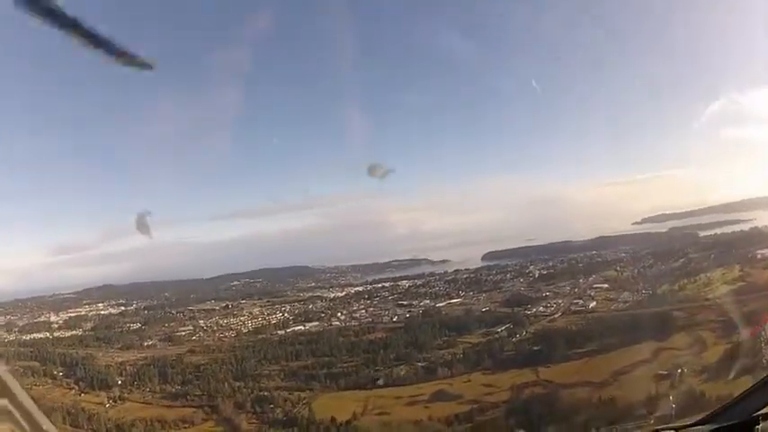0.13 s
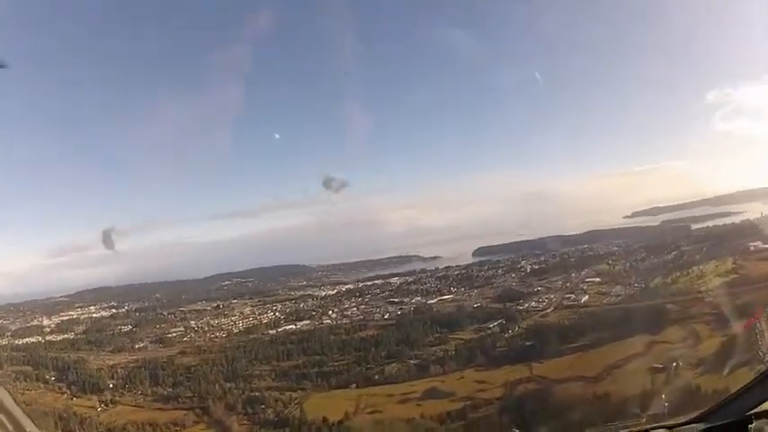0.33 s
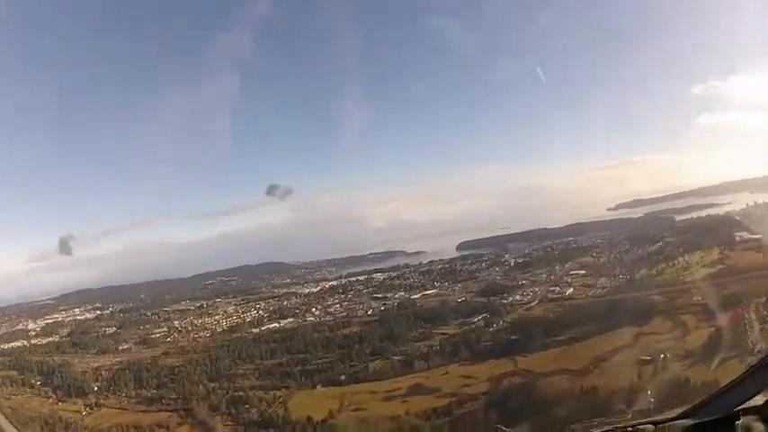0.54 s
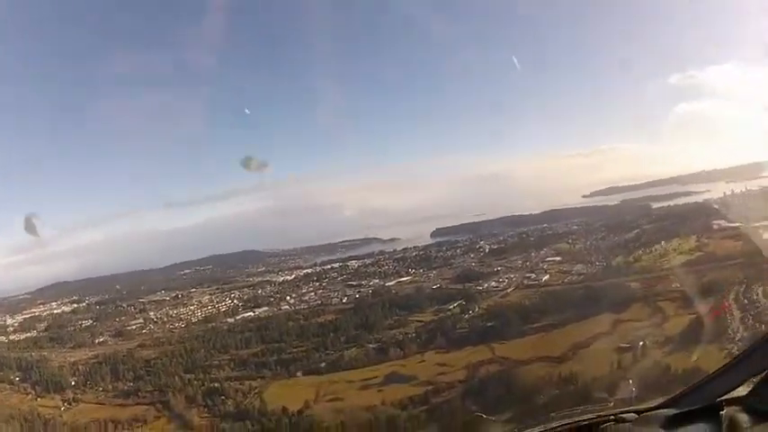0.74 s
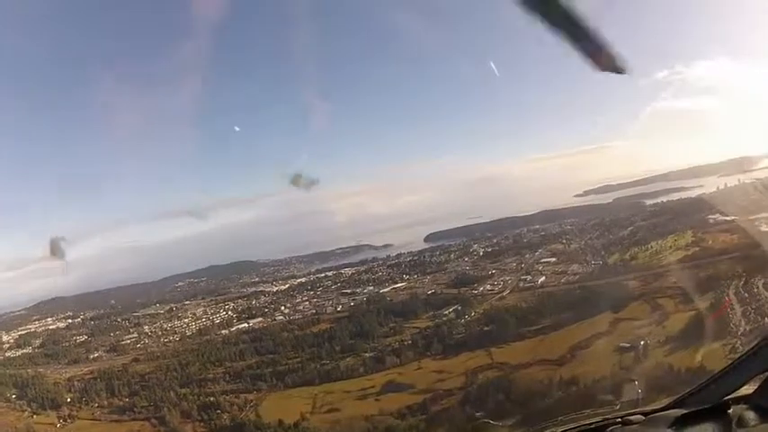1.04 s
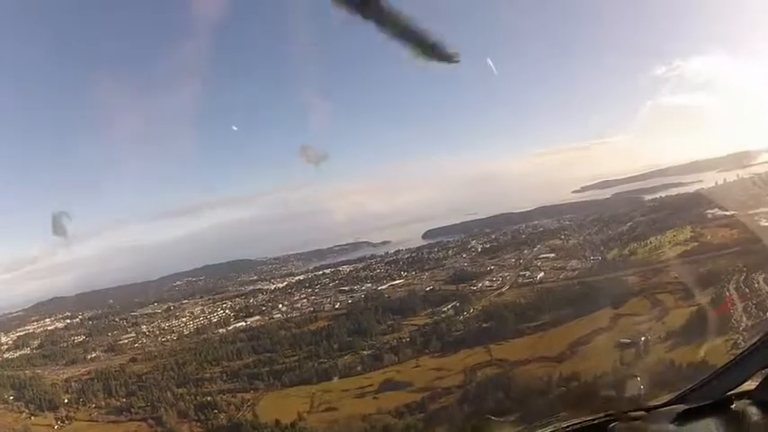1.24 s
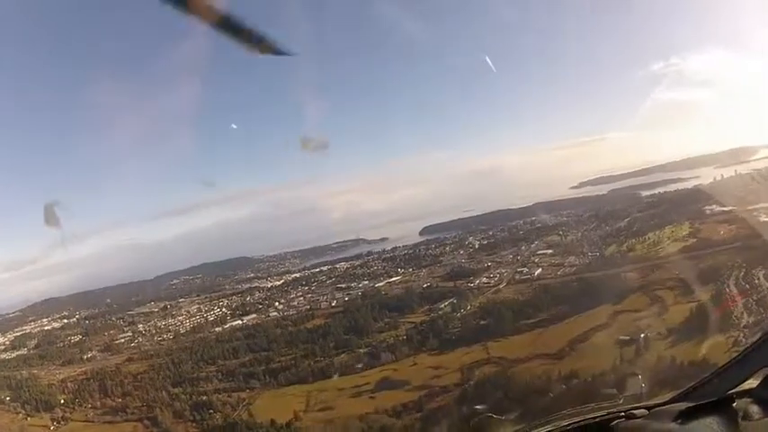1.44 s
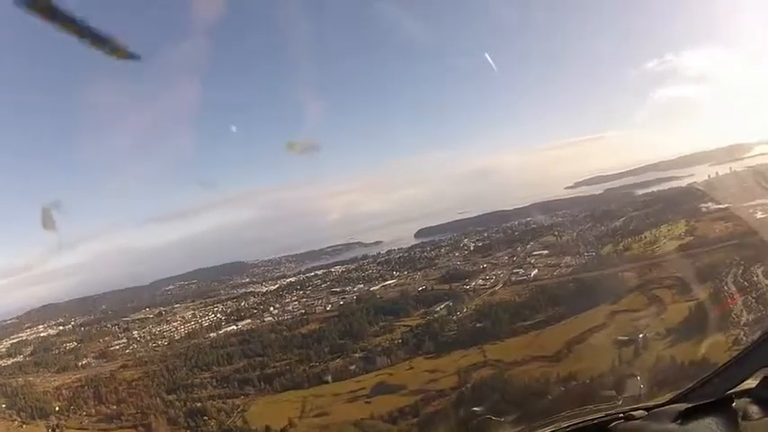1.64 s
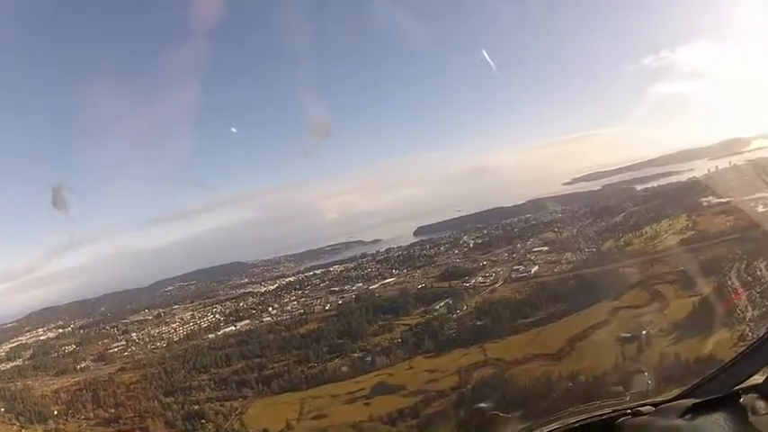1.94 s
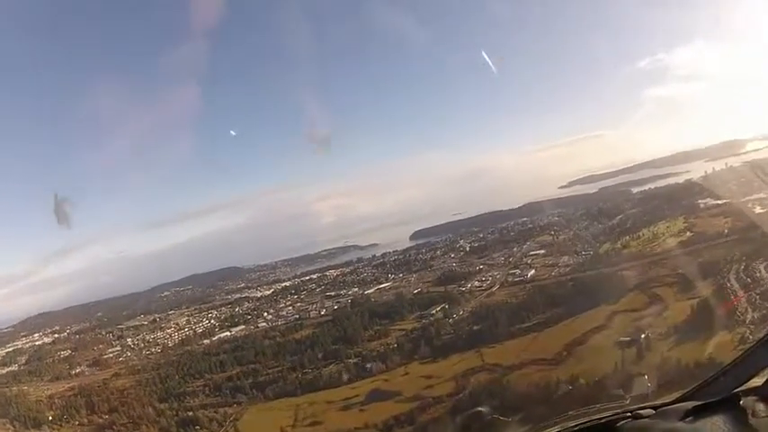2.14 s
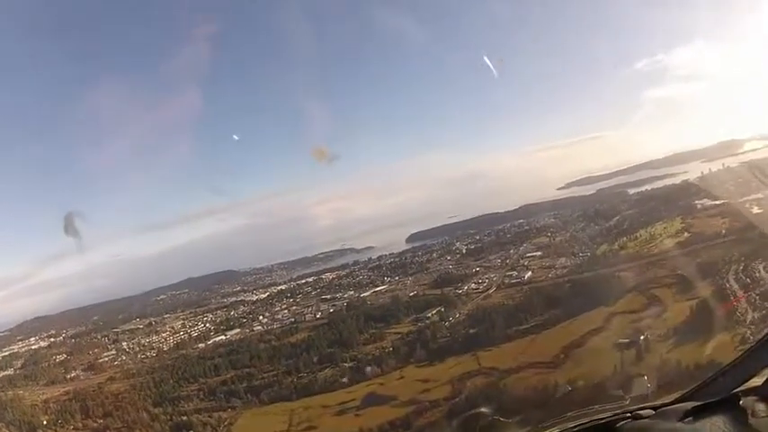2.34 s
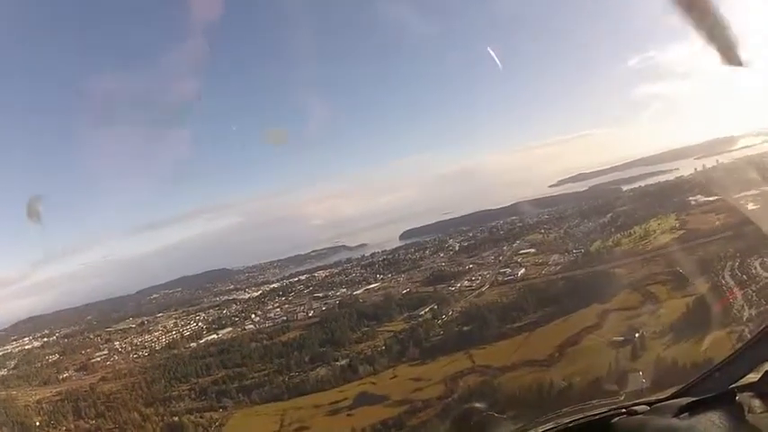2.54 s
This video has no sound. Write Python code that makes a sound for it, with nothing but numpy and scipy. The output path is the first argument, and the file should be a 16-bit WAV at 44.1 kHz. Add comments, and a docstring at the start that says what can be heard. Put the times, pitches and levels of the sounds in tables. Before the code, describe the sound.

Inside a flying helicopter: constant deep rotor and engine drone, rushing air, and high gear whine

```python
"""Helicopter cabin in steady flight

Main and tail rotor thump the hull; gearbox, engine shaft and pumps whine as sums of cosines over a wide air rush
of shaped noise. One slowly rising rotor speed ties them together; a free spool sings on its own, wandering.
Everything is sampled coarsely and each sample held, which mirrors the sound into the treble."""
import sys
import numpy as np
from scipy import signal
from scipy.fft import rfft, irfft
from scipy.io import wavfile
from scipy.ndimage import uniform_filter1d

SR = 44100
rng = np.random.default_rng(int(sys.argv[2]) if len(sys.argv) > 2 else 0)


def generate_wav(sig):
    """Save sig (samples, or channels by samples) to the path in sys.argv[1] as 16-bit PCM at SR."""
    pcm = np.round(np.clip(np.atleast_2d(sig).T, -1, 1) * 32767).astype(np.int16)
    wavfile.write(sys.argv[1], SR, pcm)


def invert_db(level):
    """Linear amplitude ratio for a level in decibels (20 dB per decade), elementwise."""
    return 10 ** (np.asarray(level, dtype=float) / 20)


N = 119070
BLADES, RING_TEETH = 3, 100
SHAFT_RATIO = 15.55  # engine shaft turns per rotor turn
LOW_WAVER_DB, HIGH_WAVER_DB, WAVER_HZ = 0.5, 1, 6


def evened(x):
    """Scales to rms 1."""
    return x / np.sqrt(np.mean(x ** 2) + 1e-20)


def curve(table, column):
    """One column of a time table, interpolated at every sample."""
    rows = np.array(table)
    return np.interp(np.arange(N) / SR, rows[:, 0], rows[:, column])


def wander(time_s, top_hz):
    """Slow random drift of rms 1: twelve sines, the slower the stronger."""
    hz = np.geomspace(top_hz / 10, top_hz, num=12)[:, None]
    sines = np.sin(2 * np.pi * (hz * time_s + rng.random((12, 1))))
    return evened((sines / np.sqrt(hz)).sum(0))


def tone(cycles, level_db, waver_db, free=1):
    """Cosine of rms level_db on a cycle count, its level wavering; a free tone starts at any angle."""
    coarse_s = np.arange(0, N + 256, 256) / SR
    waver = np.interp(np.arange(N) / SR, coarse_s, wander(coarse_s, WAVER_HZ))
    peak = np.sqrt(2) * invert_db(level_db + waver_db * waver)
    return peak * np.cos(2 * np.pi * (cycles + free * rng.random()))


# air spectrum through the cabin's resonances: pitch_hz, density_db_per_hz
AIR_SPECTRUM = [(10, -82), (30, -73), (50, -61), (75, -68.5), (105, -56), (125, -62), (160, -63),
                (210, -61), (290, -64.5), (490, -68), (600, -76), (720, -77.5), (900, -86), (1070, -80),
                (1150, -82), (1240, -80), (1330, -71), (1410, -72.5), (1500, -74), (1620, -80.5),
                (1685, -71.5), (1740, -78.5), (1850, -78), (2130, -72.5), (2400, -80), (2620, -75),
                (2850, -80.5), (3050, -76), (3230, -75), (3320, -81.5), (3430, -75.5), (3800, -83.5),
                (4250, -86), (4900, -89.5), (5170, -85), (5350, -89), (5700, -90.5), (6000, -107)]
PATCHY_DB, SWELL_DB, CHOP_DB = 0.5, 0.5, 0.5
SWELL_TOP_HZ = 2.95


def air_rush(turns):
    """Random short-time spectra with faint patches and a slow swell, chopped a little by the blades."""
    frames, hz = N // 512 + 5, np.fft.rfftfreq(2048, 1 / SR)
    real, imag, patches = rng.standard_normal((frames, 1025, 3)).T
    patches = uniform_filter1d(patches, size=20, axis=0)
    patches = evened(uniform_filter1d(patches, size=6, axis=1))
    table_hz, table_db = np.transpose(AIR_SPECTRUM)
    shape_db = np.interp(np.log(hz + 1), np.log(table_hz + 1), table_db, right=-140)[:, None]
    swell = wander(np.arange(frames) * 512 / SR, SWELL_TOP_HZ)
    spectra = (real + 1j * imag) * invert_db(shape_db + PATCHY_DB * patches + SWELL_DB * swell)
    power = np.sum(invert_db(shape_db) ** 2) * hz[1]
    air = signal.istft(spectra, nperseg=2048, noverlap=1536)[1][:N]
    air = evened(air) * np.sqrt(power)
    return air * invert_db(CHOP_DB * np.cos(2 * np.pi * BLADES * turns))


# free spool whistle: time_s, pitch_hz, level_db
SPOOL_TRACK = [(0, 1101, -63), (.5, 1090, -63), (1., 1074, -60.5), (1.2, 1060, -56), (1.4, 1058, -55),
               (1.65, 1074, -60.5), (2., 1076, -63), (2.7, 1092, -62)]


def spool():
    """A thin whistle whose speed drifts apart from the rotors."""
    cycles = np.cumsum(curve(SPOOL_TRACK, column=1)) / SR
    return tone(cycles, curve(SPOOL_TRACK, column=2), HIGH_WAVER_DB)


# steady pumps: cycles_per_rotor_turn
PUMP_RATIOS = [121.35, 202.14, 203.58]
# steady pumps, same order: level_db
PUMP_LEVELS = [-64.5, -60, -54]
BEATING_RATIO, BEATING_START_DB, BEATING_RISE_DB_PER_S = 108.38, -59, 1.5
BEAT_HZ, BEAT_GROWTH_PER_S, BEAT_PEAK_S = 3.45, 0.3, 0.16


def pumps(turns):
    """Tones at fixed ratios to the rotor; one more grows louder while its slow beat deepens."""
    steady = sum(tone(ratio * turns, level_db, HIGH_WAVER_DB)
                 for ratio, level_db in zip(PUMP_RATIOS, PUMP_LEVELS))
    time_s = np.arange(N) / SR
    beat = 1 + BEAT_GROWTH_PER_S * time_s * np.cos(2 * np.pi * BEAT_HZ * (time_s - BEAT_PEAK_S))
    rising_db = BEATING_START_DB + BEATING_RISE_DB_PER_S * time_s
    return steady + beat * tone(BEATING_RATIO * turns, rising_db, LOW_WAVER_DB)


# engine shaft: order: level_db
SHAFT_ORDERS = {1: -45.5, 2: -54.5, 12: -64, 15: -55, 34: -64.5}
SHAFT_LAG_CYCLES = 0.57


def engine_shaft(turns):
    """Orders of the engine shaft, locked in phase to its turning."""
    shaft_turns = SHAFT_RATIO * turns - SHAFT_LAG_CYCLES
    return sum(tone(order * shaft_turns, level_db, HIGH_WAVER_DB, free=0)
               for order, level_db in SHAFT_ORDERS.items())


# planet gear mesh: harmonic: level_db
MESH_HARMONICS = {1: -60.5, 2: -47, 3: -56.5, 4: -62, 5: -60, 7: -76, 8: -67.5}
# moving gear levels: time_s, sixth_mesh_harmonic_db, pinion_db
GEAR_LEVELS = [(0, -54, -55), (.3, -56, -49), (.55, -58, -45), (.85, -58, -44.5), (1.15, -57, -49.5),
               (1.5, -54, -52), (1.9, -54, -49), (2.3, -54, -49), (2.7, -52.5, -44.5)]
PINION_TEETH = 17
PLANET_DEPTH, PLANET_LEAN_RAD = 0.14, 0.16  # once-a-turn swell; phase sway, upper sideband stronger


def gearbox(turns):
    """Planet mesh harmonics swell and sway once a rotor turn, beside a sixth harmonic and pinion whine."""
    swell = 1 + PLANET_DEPTH * np.cos(2 * np.pi * turns)
    swayed = turns + PLANET_LEAN_RAD / (2 * np.pi * RING_TEETH) * np.sin(2 * np.pi * turns)
    mesh = swell * sum(tone(k * RING_TEETH * swayed, level_db, HIGH_WAVER_DB)
                       for k, level_db in MESH_HARMONICS.items())
    sixth = tone(6 * RING_TEETH * turns, curve(GEAR_LEVELS, column=1), waver_db=0.8)
    pinion = tone(PINION_TEETH * SHAFT_RATIO * turns, curve(GEAR_LEVELS, column=2), waver_db=0.27)
    return mesh + sixth + pinion


# tail shaft, harmonics from 1 up: level_db
TAIL_HARMONICS = [-53, -47, -62, -35, -64, -53]
TAIL_RATIO, TAIL_LAG_CYCLES = 5.3015, 0.06


def tail_rotor(turns):
    """The tail shaft hums at a fixed ratio to the rotor, its harmonics in step."""
    tail_turns = TAIL_RATIO * turns - TAIL_LAG_CYCLES
    return sum(tone(k * tail_turns, level_db, LOW_WAVER_DB, free=0)
               for k, level_db in enumerate(TAIL_HARMONICS, start=1))


# blade passes, harmonics from 1 up: level_db
BLADE_HARMONICS = [-55, -47.5, -43, -48, -42, -48, -58, -62, -60, -51, -58, -53]
BLADE_LAG_CYCLES = 0.085
HULL_HARMONIC = 5  # a hull resonance turns this one upside down


def main_rotor(turns):
    """Each blade pass is one thump, its harmonics in step."""
    passes = BLADES * turns - BLADE_LAG_CYCLES
    thump = np.zeros(N)
    for k, level_db in enumerate(BLADE_HARMONICS, start=1):
        sign = -1 if k == HULL_HARMONIC else 1
        thump += sign * tone(k * passes, level_db, LOW_WAVER_DB, free=0)
    return thump


# planet gear mesh, sets every speed but the spool's: time_s, mesh_hz
MESH_SPEED = [(0, 643.35), (.7, 643.75), (1.25, 645.05), (1.65, 645.95), (2.1, 646.85), (2.7, 647.85)]


def scene():
    """Air, spool, gears and rotors summed to mono."""
    turns = np.cumsum(curve(MESH_SPEED, column=1)) / SR / RING_TEETH
    machinery = pumps(turns) + engine_shaft(turns) + gearbox(turns)
    rotors = tail_rotor(turns) + main_rotor(turns)
    return (air_rush(turns) + spool() + machinery + rotors)[None]


def low_pass(x):
    """Removes everything above the highest recorded frequency."""
    return signal.sosfilt(signal.butter(12, 15850, fs=SR, output="sos"), x)


HOLD_HZ, EDGE_HZ = 12000, 15270  # sampling rate of the hold; treble cut


def record(dry):
    """Coarse held samples: mirror copies around the sampling rate, the hold's sinc droop, a treble cut."""
    copies = dry * (1 + 2 * np.cos(2 * np.pi * HOLD_HZ * np.arange(N) / SR))
    hz = np.fft.rfftfreq(N, 1 / SR)
    droop = np.sinc(hz / HOLD_HZ)
    held = irfft(rfft(copies) * droop * (hz < EDGE_HZ), N)
    return low_pass(held)


dry = scene()
out = record(dry)
generate_wav(out)
```